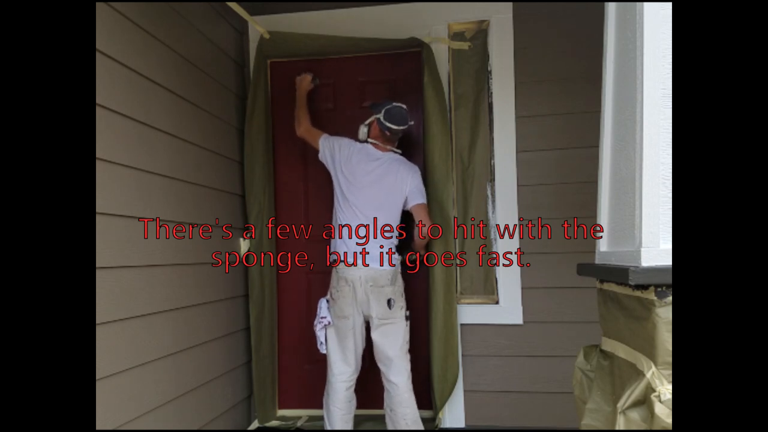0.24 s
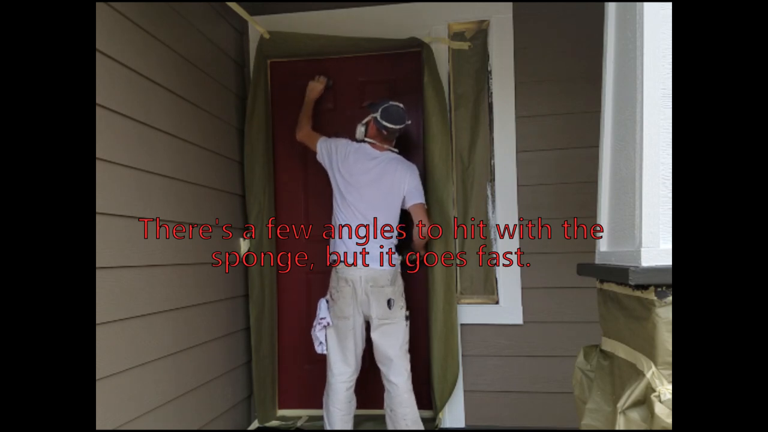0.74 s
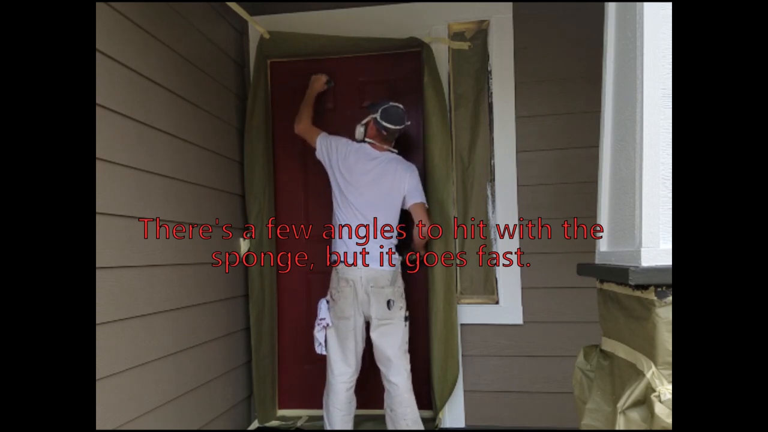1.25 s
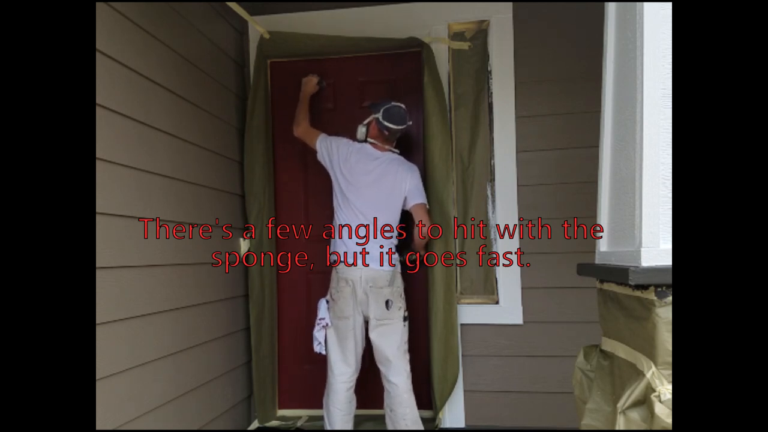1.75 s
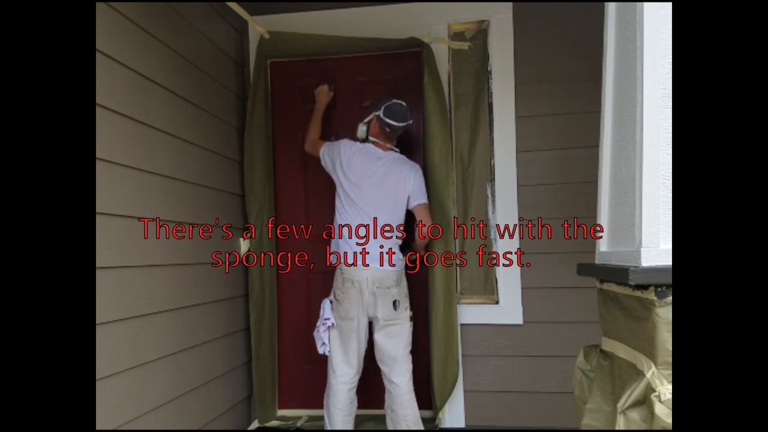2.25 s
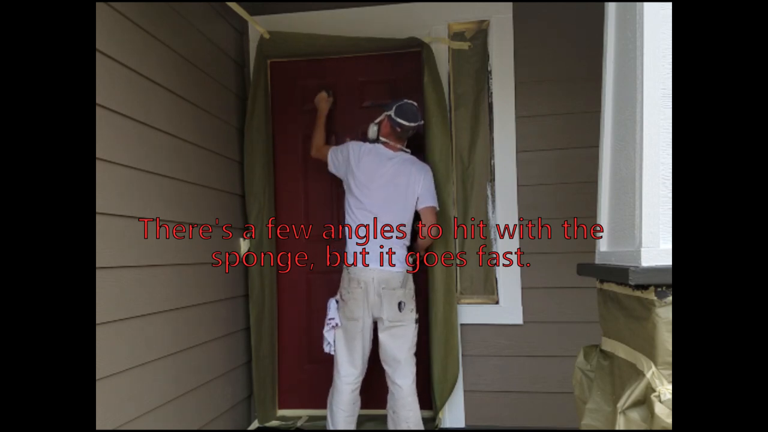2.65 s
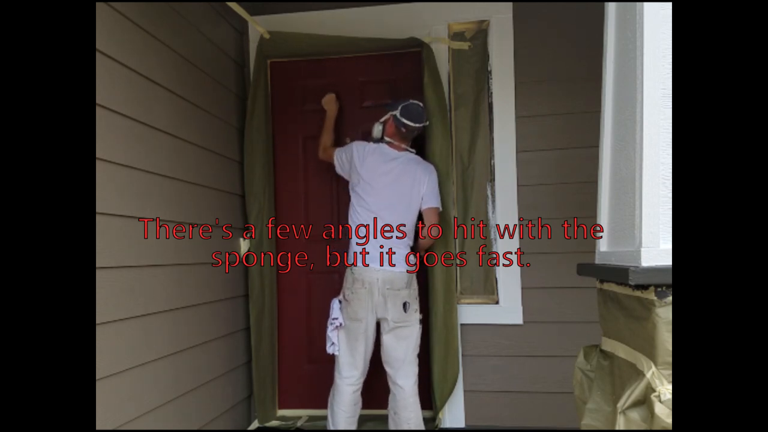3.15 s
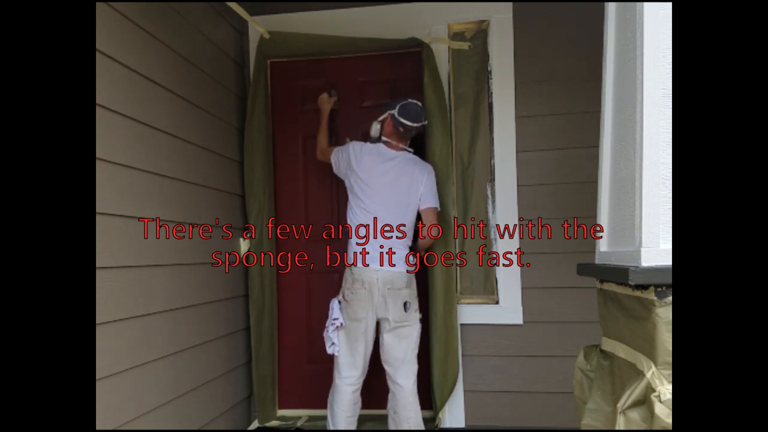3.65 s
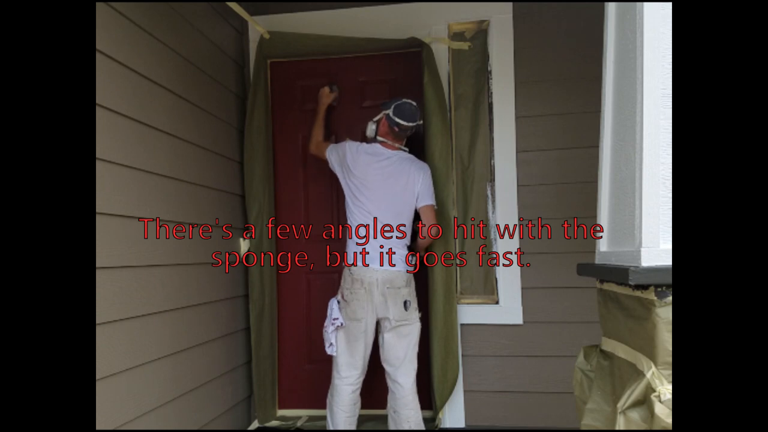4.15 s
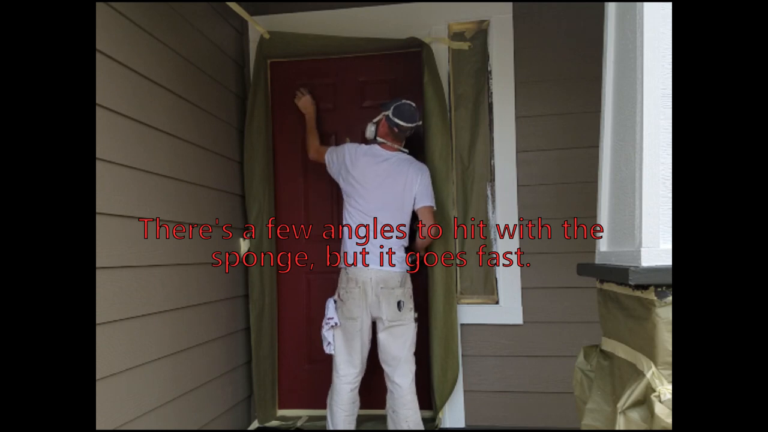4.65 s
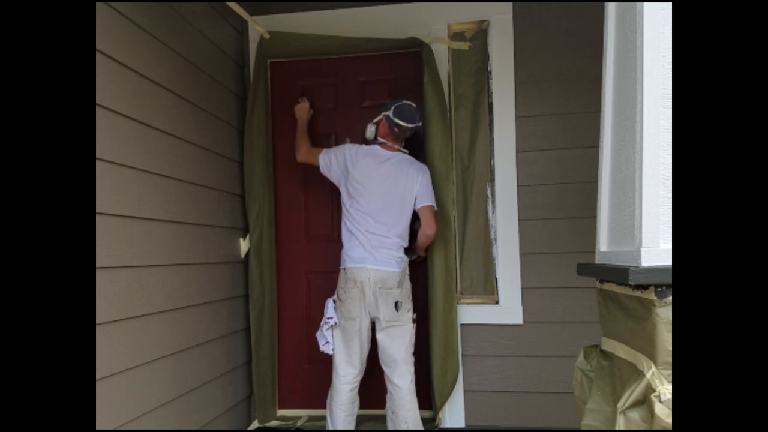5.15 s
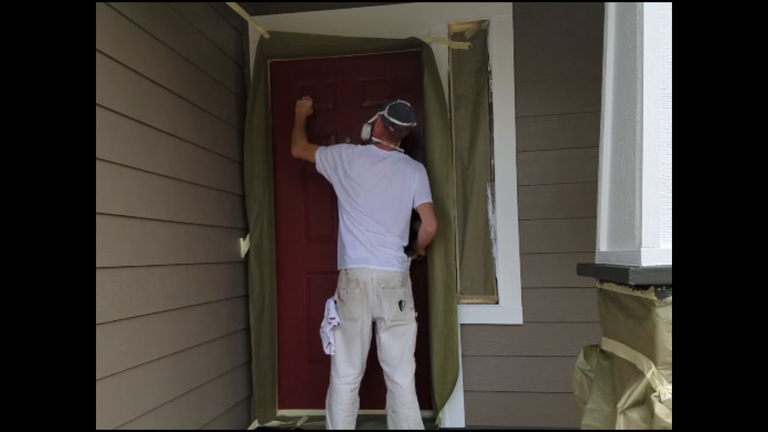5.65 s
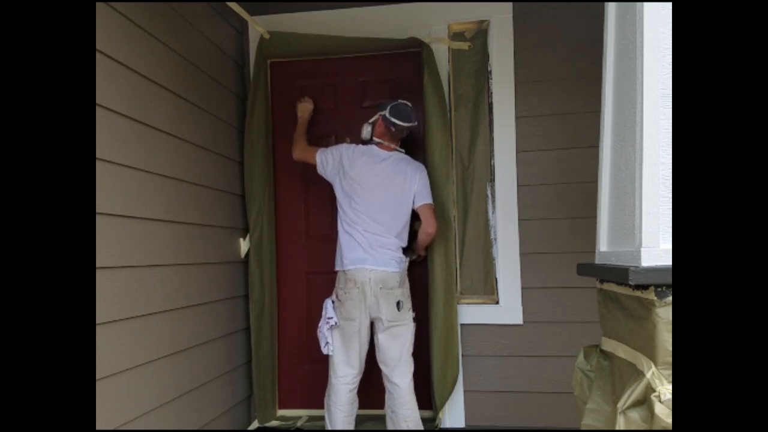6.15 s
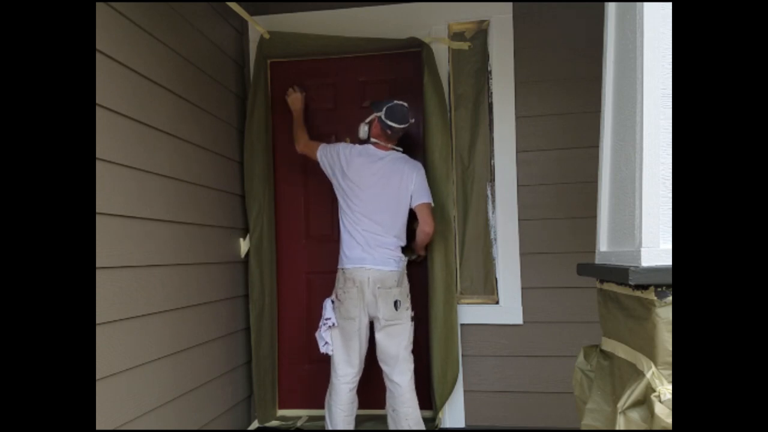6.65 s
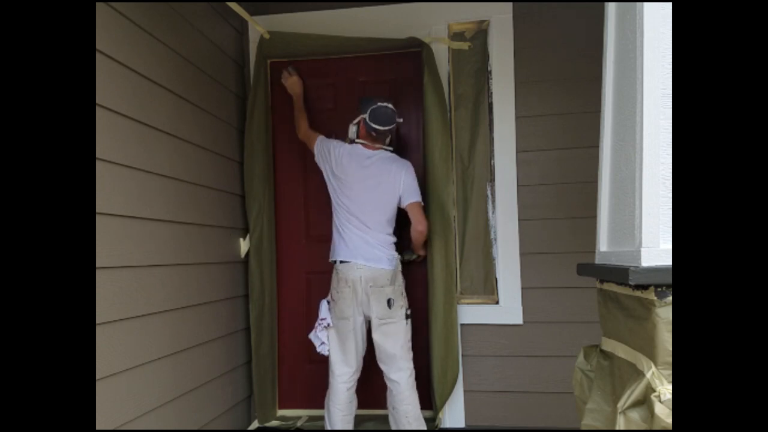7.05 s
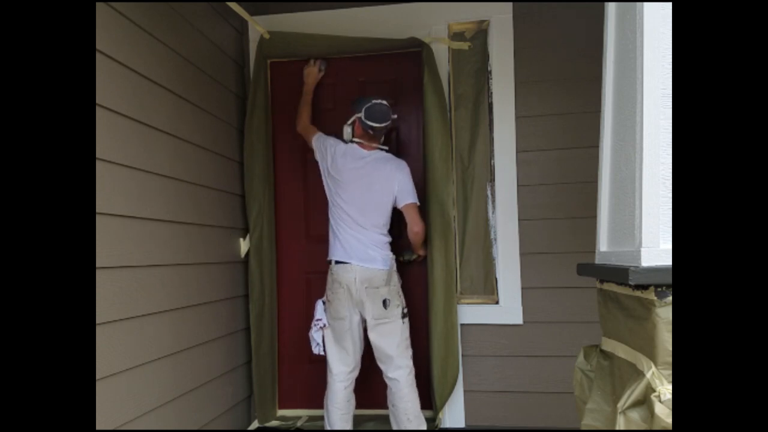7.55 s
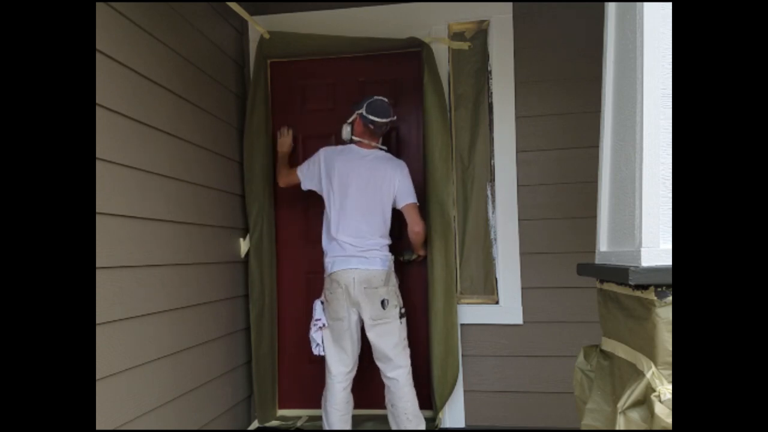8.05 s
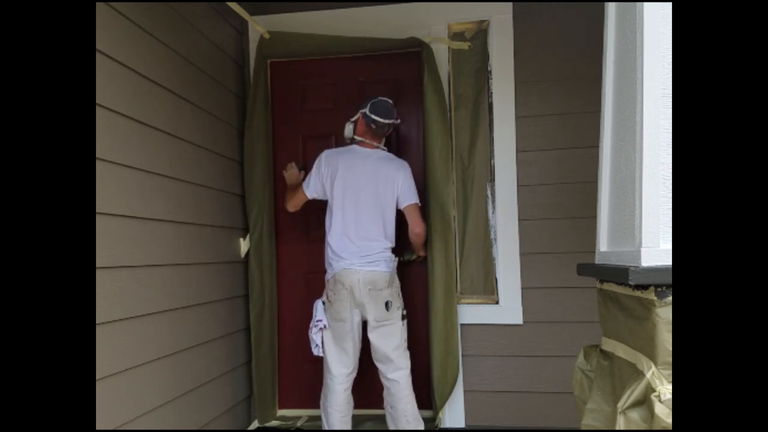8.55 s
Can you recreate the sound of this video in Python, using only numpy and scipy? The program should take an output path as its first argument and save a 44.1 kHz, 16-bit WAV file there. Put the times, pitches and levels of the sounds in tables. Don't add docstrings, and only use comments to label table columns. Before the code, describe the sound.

On a covered porch, a fine sanding sponge rubs a painted steel door in brisk, even, dry strokes, about seven a second. A loud, hollow thump lands midway, with softer bumps afterward, and the strokes lengthen into wider swishes near the end. The leaf rumbles softly under the hand. Far traffic hums low. Stereo microphone a few metres away, with short wall reflections.

```python
import sys
import numpy as np
from scipy import signal
from scipy.fft import rfft, irfft, next_fast_len
from scipy.io import wavfile
from scipy.ndimage import uniform_filter1d, map_coordinates

SR = 44100
rng = np.random.default_rng(int(sys.argv[2]) if len(sys.argv) > 2 else 0)


def natural_amplitude(level_db):
    exponent = np.asarray(level_db, float) / 20
    return 10 ** exponent


def bounce(signal):
    frames = np.transpose(np.atleast_2d(signal))
    limited = np.clip(frames, -1, 1)
    pcm = np.round(limited * 32767).astype(np.int16)
    wavfile.write(sys.argv[1], SR, pcm)


N = 387631
TIME = np.arange(N) / SR


def unit(x):
    return x / np.sqrt(np.mean(x ** 2) + 1e-20)


def along(points, hz):
    f, v = np.transpose(points)
    return np.interp(np.log(hz + 1), np.log(f + 1), v)


def curve(rows):
    s, value = np.transpose(rows)
    return np.interp(TIME, s, value)


def wobble(rate):
    knots = rng.standard_normal(int(N * rate / SR) + 4)
    return map_coordinates(knots, [TIME * rate])


def ease(x):
    return np.abs(np.sin(np.pi / 2 * np.clip(x, 0, 1)))


def swells(rows):
    return sum(natural_amplitude(db - 24 * np.clip((TIME - s) / width, -3, 3) ** 2) for s, db, width in rows)


def filtered(x, response):
    m = next_fast_len(x.shape[-1] + SR // 4)
    spectrum = rfft(x, m) * response(np.fft.rfftfreq(m, 1 / SR))
    return irfft(spectrum, m)[..., :x.shape[-1]]


def add(track, s, sound):
    part = track[..., round(s * SR):][..., :sound.shape[-1]]
    part += sound[..., :part.shape[-1]]


# f/Hz, correlation 0-1
PORT_LIKENESS = [(40, 0.95), (120, 0.96), (300, 0.86), (600, 0.51), (1200, 0.29), (2500, 0.24),
                 (6000, 0.011)]


def stereo(pair, spectrum):
    def mid_side(hz):
        turn = np.arccos(np.clip(along(PORT_LIKENESS, hz), -1, 1)) / 2
        return natural_amplitude(along(spectrum, hz)) * [np.cos(turn), np.sin(turn)]

    mid, side = filtered(pair, mid_side)
    return unit(np.array([mid + side, mid - side]))


def noise(spectrum):
    return stereo(rng.standard_normal((2, N)), spectrum)


# f/Hz, level/dB per Hz
TRAFFIC_COLOUR = [(8.8, -36), (15, 2.5), (81, 1), (336, -18.5), (400, -21.5), (1000, -14.5), (1300, -70),
                  (2200, -120)]
# f/Hz, level/dB per Hz
AIR_COLOUR = [(530, -20), (900, -14.5), (1550, -10), (2190, -9), (4520, -17), (6400, -17.5), (7960, -22.5),
              (16000, -11)]
# t/s, level/dB
AIR_LEVEL = [(0, -42.5), (.85, -32.5), (1, -40), (3.1, -51.5), (3.5, -55), (4.48, -40.5), (4.65, -32),
             (5.21, -41), (5.68, -35), (6.4, -42), (7.1, -27), (7.9, -42), (8.4, -34), (8.56, -32),
             (8.66, -31), (8.79, -26.5)]


def outdoors():
    traffic = natural_amplitude(-44.5 + 3.85 * wobble(4.02)) * noise(TRAFFIC_COLOUR)
    air = natural_amplitude(curve(AIR_LEVEL) - 3.5 + 0.7 * wobble(3.3)) * noise(AIR_COLOUR)
    return traffic + air


# f/Hz, t60/s
PORCH_DECAY = [(200, 0.066), (1500, 0.24), (5000, 0.055), (14000, 0.1)]


def porch(x):
    out, hop = np.zeros((2, N)), SR // 5
    for start in range(0, N, hop):
        hz, t, z = signal.stft(rng.standard_normal((2, SR // 4)), SR, nperseg=128)
        z = z * natural_amplitude(-60 * t / along(PORCH_DECAY, hz)[:, None])
        z = z / np.linalg.norm(z, axis=2, keepdims=True)
        tail = signal.istft(z, SR, nperseg=128)[1]
        tail = tail / np.linalg.norm(tail[0])
        answer = signal.fftconvolve(x[:, start:start + hop], tail, axes=1)
        add(out, start / SR + .006, answer)
    return out


# t/s, level/dB
HAND_PRESSURE = [(0, -5.5), (.6, 1), (.7, 4.5), (.9, -1.5), (1.6, 1), (2.15, 3.5), (2.6, -3.5), (3.5, -1.5),
                 (4.3, -3), (4.65, 5.5), (5.6, 0), (5.88, 5.5), (6.1, -7), (6.65, 2.5), (6.85, -4),
                 (7.15, 8), (8.1, -1.5), (8.4, 6)]
# t/s at the top, peak level/dB, width/s
TURN_SHOVES = [(.055, -34, 0.029), (.345, -35, .145), (.477, -47, 0.056), (1.11, -39, 0.025),
               (1.245, -46, .11), (1.392, -34, 0.069), (1.492, -30.5, 0.077), (1.601, -37, 0.032),
               (1.687, -20.5, 0.06), (2.039, -31, 0.026), (2.35, -39, .05), (2.647, -39, 0.07),
               (2.882, -26.5, 0.054), (3.143, -31.5, 0.082), (3.416, -29, .068), (3.673, -38, .062),
               (3.897, -44, .043), (4.219, -40, .11), (4.748, -38, 0.054), (4.854, -42, 0.11),
               (4.97, -36, 0.028), (5.08, -36, 0.065), (5.693, -28, 0.076), (5.952, -37, 0.05),
               (6.085, -35, 0.024), (6.176, -25.5, 0.07), (6.829, -40, 0.048), (7.098, -36, 0.078),
               (7.479, -39, .047), (6.47, -32, .08)]
# t/s at the top, peak level/dB, width/s
EDGE_JOLTS = [(.92, -39, 0.043), (1.475, -34, 0.065), (1.68, -42, .08), (1.84, -37.5, 0.043),
              (2.12, -34, 0.13), (2.31, -40, .05), (3.58, -41, 0.15), (4.976, -37, 0.05),
              (5.04, -33, 0.034), (5.12, -35.5, 0.1), (5.88, -32.5, 0.045), (6.08, -42, 0.056),
              (6.214, -34.5, 0.15), (6.55, -34, 0.036), (6.65, -32.5, 0.086), (7.13, -37, 0.16),
              (7.44, -44, 0.037), (8.3, -35.5, 0.074), (6.8, -39, 0.14), (5.62, -41, 0.16),
              (4.25, -48, 0.13)]
# f/Hz, level/dB per Hz
RUMBLE_COLOUR = [(56, -44), (95, 2), (188, -8.5), (227, -6), (330, -9), (400, -18.5), (550, -37),
                 (920, -120)]
# f/Hz, level/dB per Hz
DRAG_COLOUR = [(220, -44), (380, -42), (425, -4), (677, -3.5), (1100, -12), (1430, -13), (2420, -120)]


def leaf():
    flex_db, rumble_db, drag_db = -46.5, -42.5, -47.5
    rumble_press = 0.38
    press_db = curve(HAND_PRESSURE)
    bend = swells(TURN_SHOVES) + natural_amplitude(flex_db + 1.7 * wobble(7.7))
    jolts = swells(EDGE_JOLTS)
    phase = 2 * np.pi * np.cumsum(66 + 3 * wobble(7)) / SR
    port_gain = natural_amplitude(np.array([[-.3], [.3]]))
    flex = np.sqrt(2) * np.sin(phase) * port_gain * bend * natural_amplitude(2.2 * wobble(28))
    shake = np.hypot(natural_amplitude(rumble_db + rumble_press * press_db), jolts + natural_amplitude(-25.0) * bend)
    rumble = shake * natural_amplitude(1.16 * wobble(18)) * noise(RUMBLE_COLOUR)
    pull = np.hypot(natural_amplitude(drag_db + press_db), natural_amplitude(-12.5) * jolts)
    drag = pull * natural_amplitude(0.43 * wobble(25)) * noise(DRAG_COLOUR)
    return flex + rumble + drag


# t/s, peak level/dB, f/Hz, t60/s
LOW_SWINGS = [
    (5.187, -11.5, 90, 0.07),
    (5.224, -15, 75, .1),
    (5.257, -11, 72.5, 0.11),
    (5.282, -11, 108, 0.059),
    (5.296, 0, 91.5, 0.047),
    (5.325, -22.5, 68.6, 0.37),
]


def low_swings():
    out, t = np.zeros(N), np.arange(SR // 4) / SR
    onset = 1 - np.exp(-t / 0.0045)
    for s, db, hz, t60 in LOW_SWINGS:
        add(out, s, natural_amplitude(db + 3 - 60 * t / t60) * np.sin(2 * np.pi * hz * t) * onset)
    return out * natural_amplitude(np.array([[-9], [5.5]]))


# t/s, peak level/dB, f/Hz, t60/s
EDGE_TICKS = [(.6735, -24, 600, .02), (1.831, -27, 770, .04), (1.842, -25, 744, 0.044),
              (1.852, -31, 764, .04), (1.865, -30, 700, .03), (3.245, -27.5, 910, 0.037),
              (3.254, -29, 820, 0.046), (4.4718, -18, 9000, 0.0037), (5.379, -24, 3000, .03),
              (5.379, -23, 2300, .02), (5.377, -23.5, 1420, 0.037), (5.385, -24, 2530, .03),
              (6.3345, -30, 1900, .02), (6.357, -28, 1710, .03), (7.960, -19.5, 397, 0.026),
              (7.964, -23, 610, 0.027), (8.2715, -17, 750, 0.034), (8.275, -27, 1440, .03),
              (8.287, -29, 1500, .02), (8.246, -28.5, 1400, .03), (4.4724, -13, 13500, .004),
              (4.4713, -20, 5460, 0.0043)]


def ticks():
    out, t = np.zeros(N), np.arange(SR // 10) / SR
    for s, db, hz, t60 in EDGE_TICKS:
        onset = 1 - np.exp(-t * hz * 3)
        add(out, s, natural_amplitude(db - 60 * t / t60) * np.sin(2 * np.pi * hz * t) * onset)
    return out


# t/s, length/s, peak level/dB, f/Hz, breathiness 0-1
FOAM_SQUEAKS = [
    (0.109, 0.092, -41.5, 815, 0.24),
    (3.45, 0.04, -35, 657, 0.5),
    (4.366, 0.043, -26.5, 785, 0.45),
    (8.21, 0.017, -32, 684, 0.1),
    (8.227, 0.0091, -23.5, 740, 0),
    (8.241, 0.016, -24.5, 686, 1),
    (8.224, 0.058, -28, 239.5, 0.14),
    (8.283, 0.0079, -24, 730, 0.5),
]


def squeaks():
    out = np.zeros(N)
    for s, length, db, hz, breathy in FOAM_SQUEAKS:
        t = np.arange(round(length * SR)) / SR
        drift = np.cumsum(rng.standard_normal(len(t))) * 0.18 * np.clip(breathy, 0, 1)
        phase = 2 * np.pi * hz * t + drift
        tone = np.sin(phase) + 0.13 * np.sin(2 * phase)
        add(out, s, natural_amplitude(db) * np.sin(np.pi * t / length) ** 1.16 * tone)
    return out


# t/s, peak level/dB, hardness f/Hz, ring share, weight on
# the low modes/dB
DOOR_BLOWS = [(0.675, -24.5, 1990, 0.78, -24), (2.385, -30.5, 3000, 0.54, -4),
              (4.398, -16.5, 298, 0.49, -4), (4.411, -12, 298, 0.085, 0), (4.424, -31, 300, 0.26, -7),
              (4.436, -16, 300, 0.17, -4), (4.443, -15, 300, 0.3, -3), (4.461, -39, 350, 0.23, -7),
              (4.472, 1.3, 2000, 1.25, -1.5), (5.11, -17, 250, 0.34, 2), (5.376, -5, 300, 0.55, 5.5),
              (5.398, -7.5, 250, 1.3, 2.5), (6.061, -24.5, 2500, 0.43, -5),
              (6.3345, -18, 400, 0.36, -15), (6.345, -14, 400, 0.3, -7), (6.355, -7.5, 600, 0.35, 3),
              (6.368, -8.5, 600, 0.43, 3), (6.382, -16, 400, 1.46, 6), (6.639, -25, 500, 0.31, 1),
              (8.76, -14.5, 500, 2.5, -4)]
# f/Hz, level/dB, t60/s
DOOR_MODES = [(73.5, -0.5, 0.2), (166.6, -9.5, 0.26), (266.5, -2, 0.35), (316, -8.5, 0.37),
              (770, -26, 0.16), (1686, 0, 0.11),
              (91, -4, 0.22), (124, 0, 0.098), (204.6, -9, 0.387)]
# f/Hz, level/dB, t60/s
CROWDED_MODES = [(98, -17.5, 0.46), (250, -5.5, 0.42), (500, -9, 0.18), (950, -9, 0.09),
                 (1560, -2.5, 0.037), (2500, -11.5, 0.067), (5960, 0, 0.0072)]


def knocks():
    body_db, body_share = 4, 0.53
    crack_db, crack_t60 = -10, .025
    out, t = np.zeros(N), np.arange(SR // 3) / SR
    crowd_hz, crowd_db, crowd_t60 = np.transpose(CROWDED_MODES)
    for s, db, hard_hz, ring, weight_db in DOOR_BLOWS:
        modes = np.zeros(len(t))
        for hz, level, t60 in DOOR_MODES:
            struck_db = 0
            if hz < 140:
                struck_db = weight_db
            elif hz < 220:
                struck_db = body_db + body_share * weight_db
            mode_db = level + struck_db + rng.standard_normal() - 60 * t / (t60 * ring)
            modes += natural_amplitude(mode_db) * np.sin(2 * np.pi * hz * t)

        hz, frames, z = signal.stft(rng.standard_normal(len(t)), SR, nperseg=256)
        level = np.interp(np.log(hz + 1), np.log(crowd_hz), crowd_db)[:, None]
        t60 = np.interp(np.log(hz + 1), np.log(crowd_hz), crowd_t60)[:, None]
        z = z * natural_amplitude(level + 25.0 - 60 * frames / (t60 * ring))
        crowd = signal.istft(z, SR, nperseg=256)[1][:len(t)]

        def soft(f):
            deep = 1j * f / (62 + 1j * f)
            return deep / (1 + 1j * f / hard_hz) ** 2 / (1 + 1j * f / (2.3 * hard_hz))

        crack = natural_amplitude(crack_db - 60 * t / crack_t60) * np.diff(rng.standard_normal(len(t) + 1))
        onset = 1 - np.exp(-t / 0.001)
        blow = filtered((modes + crowd + crack) * onset, soft)
        add(out, s, natural_amplitude(db) * blow / np.abs(blow).max())
    return out


def grains(spread_db, patchy_db):
    sizes = natural_amplitude(spread_db * rng.exponential(size=(2, N)))
    z = signal.stft(rng.standard_normal((2, N)) * sizes, nperseg=256)[2]
    field = uniform_filter1d(rng.standard_normal(z.shape[1:]), size=4, axis=0)
    field = uniform_filter1d(field, size=12, axis=1)
    return signal.istft(z * natural_amplitude(patchy_db * unit(field)), nperseg=256)[1][:, :N]


# t/s, length/s, grit level/dB, gain along the stroke/dB, speed-up/s
SPONGE_RUBS = [(0.001, 0.13, -22, 2, 0.056), (0.128, 0.11, -23.5, 6, 0.039), (0.266, 0.12, -23.5, 0, 0.017),
               (0.406, 0.12, -21.5, 7, 0.046), (0.547, 0.11, -28, -1, 0.015), (0.681, 0.1, -19.5, 11, 0.024),
               (0.789, 0.141, -22, 12, 0.06), (0.948, 0.12, -20.5, -2, 0.028), (1.076, 0.13, -25.5, 4, 0.019),
               (1.215, 0.12, -22.5, 9, 0.021), (1.357, 0.11, -20, 3, 0.014), (1.484, 0.12, -21.5, 1, 0.043),
               (1.615, 0.13, -22, 8, 0.033), (1.752, 0.135, -24, 3, 0.036), (1.9, 0.12, -27.5, -7, 0.036),
               (2.034, 0.16, -24.5, 14, 0.03), (2.226, 0.18, -27, -14, 0.087),
               (2.444, 0.11, -16, -22, 0.1), (2.576, 0.12, -20.0, -18, 0.073),
               (2.711, 0.093, -18, 0, 0.026), (2.825, 0.12, -22, -12, 0.033),
               (2.966, 0.11, -17.8, -8, 0.041), (3.102, 0.1, -15, -25, 0.091),
               (3.231, 0.1, -19.5, 6, 0.038), (3.356, 0.11, -20.1, 4, 0.051),
               (3.494, 0.12, -23, -19, 0.033), (3.616, 0.11, -24.5, -11, 0.071),
               (3.753, 0.12, -27.5, -2, 0.029), (3.9, 0.12, -26.5, 5, 0.035),
               (4.024, 0.14, -25.5, -11, 0.082), (4.175, 0.13, -22.8, -7, 0.037),
               (4.453, 0.12, -16.5, -3, 0.068), (4.567, 0.14, -16.1, 6, 0.056),
             (4.718, 0.12, -13.5, -2, 0.025), (4.84, 0.11, -17, 8, 0.023), (4.956, 0.11, -15, -1, 0.015),
             (5.069, 0.13, -16.5, 1, 0.025), (5.19, 0.17, -30.5, -22, 0.059),
             (5.358, 0.13, -22.5, -18, 0.056), (5.479, 0.15, -23.6, 5, 0.039),
             (5.64, 0.11, -16.5, -21, 0.065), (5.758, 0.12, -20.5, -8, 0.042),
             (5.882, 0.097, -22, -12, 0.036), (5.995, 0.111, -23, 27, 0.011),
             (6.132, 0.12, -23.5, -19, 0.01), (6.24, 0.061, -37, -13, 0.038),
               (6.337, 0.202, -19.5, 1, 0.078), (6.549, 0.14, -16.5, 6, 0.026),
              (6.676, 0.073, -29, 11, 0.005), (6.751, 0.13, -20.5, 14, 0.021),
              (6.879, 0.18, -19.2, 8, 0.052), (7.062, 0.34, -18, 3, 0.06), (7.402, 0.23, -20.5, 4, 0.064),
              (7.57, 0.098, -18.5, 8, 0.045), (7.637, 0.37, -17.5, 7.5, 0.043),
              (7.995, 0.264, -19.5, 9, 0.048), (8.252, 0.32, -18, -2, 0.081),
              (8.747, 0.067, -17.7, -4.5, 0.028)]
# t/s at the top, peak level/dB, width/s
DUST_SPOTS = [
    (.88, -27.5, 0.047),
    (2.4, -50, 0.029),
    (3.7, -34.5, 0.027),
    (3.82, -37.5, 0.065),
]
# t/s at the top, peak
# level/dB, width/s
SHEET_SWELLS = [(.715, -30.5, 0.057), (.76, -40, .04), (2.385, -34.5, 0.028), (2.46, -32.5, .022),
                (3.67, -38, 0.076), (3.82, -46, 0.065), (4.08, -43, .12), (4.98, -32, 0.033),
                (5.2, -55, .06), (6.07, -38, 0.023), (6.27, -41, .03), (6.37, -35.5, .06), (6.63, -40, .08),
                (7.6, -38, 0.092), (8.65, -38, 0.23)]
# f/Hz, level/dB per Hz
GRIT_COLOUR = [(4120, -20.5), (7000, -15), (8260, -9), (9230, -6), (12500, 1), (14500, 5), (15200, 7),
               (16000, -22)]
# f/Hz, level/dB per Hz
SCRAPE_COLOUR = [(1940, -20.5), (3500, -10.5), (4700, -4.5), (5500, -2), (6500, -2), (7900, -5.5),
                 (8800, -4), (19400, -53)]
# f/Hz, level/dB per Hz
SHEET_COLOUR = [(530, -25), (900, -18.5), (1190, -2.5), (1730, -2.5), (2900, -5), (3600, -7), (4680, -12),
                (7920, -45)]


def sponge():
    usual_db, scrape_db, sheet_db = -21, -35, -38.5
    scrape_grows, sheet_grows = 0.68, 0.44
    scrape_press, sheet_press = 0.039, 0.39
    grip_s, jerk = 0.018, 0.092
    touch_s, let_go_s = 0.0068, 0.017
    speeds, grit, scrape, sheet = np.zeros((4, N))
    press_db = curve(HAND_PRESSURE)
    for s, length, db, lean_db, rise in SPONGE_RUBS:
        t = np.arange(round(length * SR)) / SR
        fall = 0.019 + 0.21 * length
        start = ease(t / grip_s) * (jerk + (1 - jerk) * ease(t / rise) ** 2)
        speed = start * ease((length - t) / fall)
        add(speeds, s, speed)
        speed = speed * natural_amplitude(lean_db * (t / length - .5))
        touch = ease(t / touch_s) * ease((length - t) / let_go_s)
        extra_db = db - usual_db
        add(grit, s, natural_amplitude(db) * speed)
        add(scrape, s, natural_amplitude(scrape_db + scrape_grows * extra_db) * speed ** 0.6 * touch ** 0.67)
        add(sheet, s, natural_amplitude(sheet_db + sheet_grows * extra_db) * speed ** 0.18 * touch ** 0.48)
    scrape = np.hypot(scrape * natural_amplitude(scrape_press * press_db), swells(DUST_SPOTS))
    sheet = np.hypot(sheet * natural_amplitude(sheet_press * press_db), swells(SHEET_SWELLS))
    bite = natural_amplitude(0.85 * wobble(60) + 0.43 * wobble(300))
    fine = stereo(grains(1.9, patchy_db=0.4), GRIT_COLOUR)
    finest = filtered(fine, lambda hz: np.clip((hz - 11500) / 2500, 0, 1))
    fine = fine - 0.66 * (1 - np.clip(speeds, 0, 1)) * finest
    coarse = stereo(grains(0.75, patchy_db=0.9), SCRAPE_COLOUR)
    steel = stereo(grains(1.3, patchy_db=2.0), SHEET_COLOUR)
    return bite * (grit * fine + scrape * coarse + sheet * steel)


def scene():
    rubbing = sponge()
    blows = knocks() + squeaks() + ticks()
    direct = natural_amplitude(-0.3) * rubbing + blows
    answer = porch(natural_amplitude(-8.0) * rubbing + natural_amplitude(-9.5) * blows)
    return direct + answer + low_swings() + leaf() + outdoors()


def roll_off(x):
    return signal.sosfilt(signal.butter(12, 16000, fs=SR, output="sos"), x)


# f/Hz, left minus right level/dB
PORT_BALANCE = [(60, -0.7), (330, -2), (770, -1), (2740, -2.5), (4190, -1), (6410, 4.5), (9810, -9.5),
                (15000, 3.5)]


def record(dry):
    def microphone(hz):
        notch = 1 - 0.42 / (1 + ((hz - 3620) / 130) ** 2)
        dip = 1 - 0.45 / (1 + ((hz - 8050) / 330) ** 2)
        return natural_amplitude(along(PORT_BALANCE, hz) * [[.5], [-.5]]) * notch * dip

    ports = filtered(dry, microphone)
    limited = filtered(np.clip(ports, -1, 1), lambda hz: hz < 15800)
    return roll_off(limited - .003)


dry = scene()
out = record(dry)
bounce(out)
```